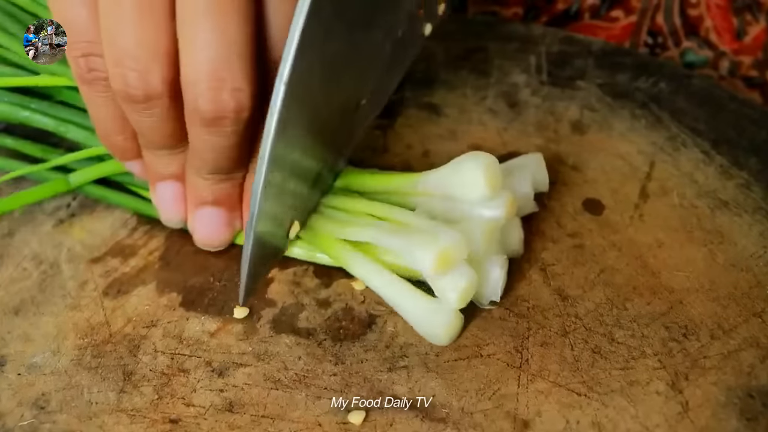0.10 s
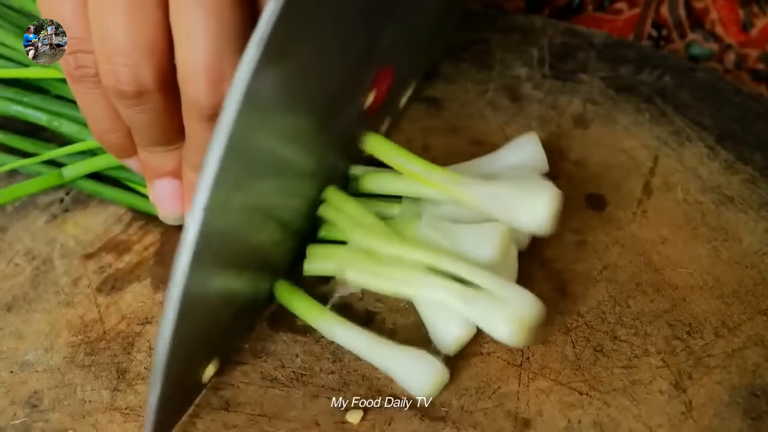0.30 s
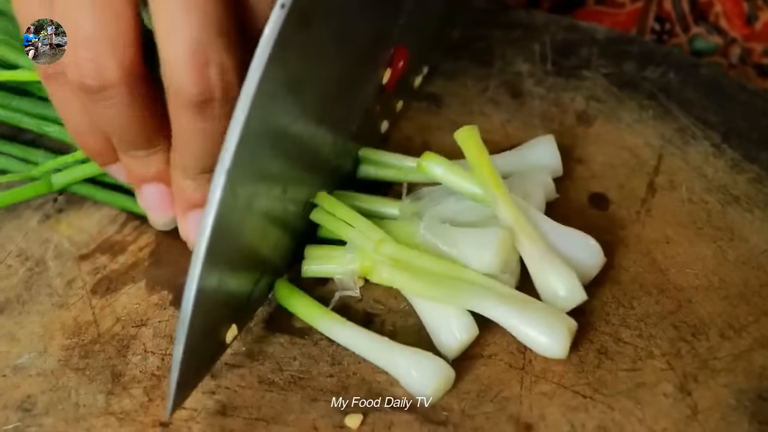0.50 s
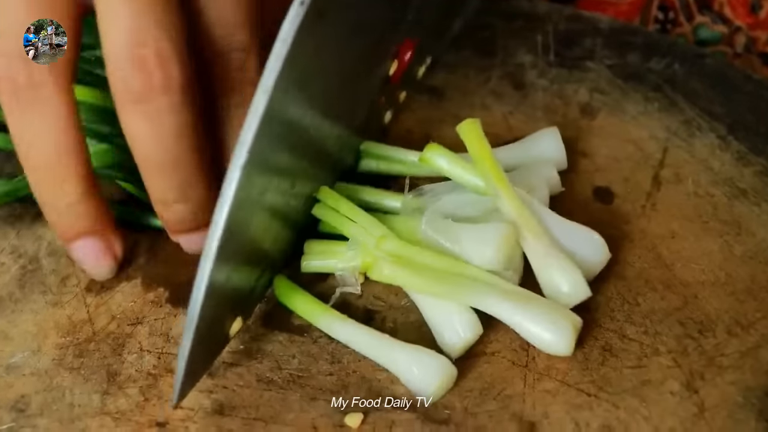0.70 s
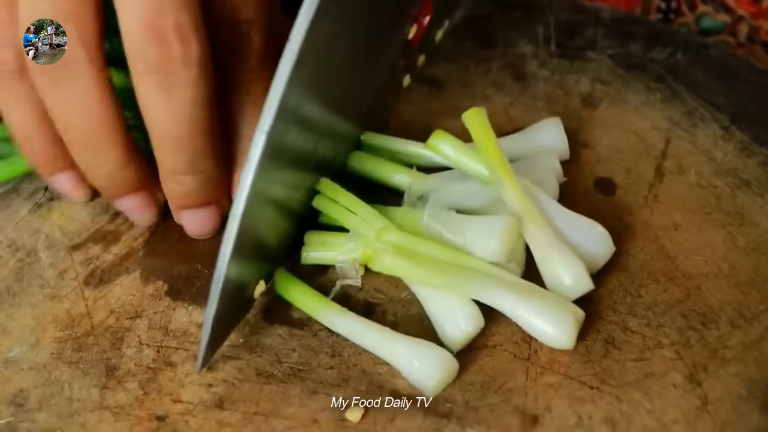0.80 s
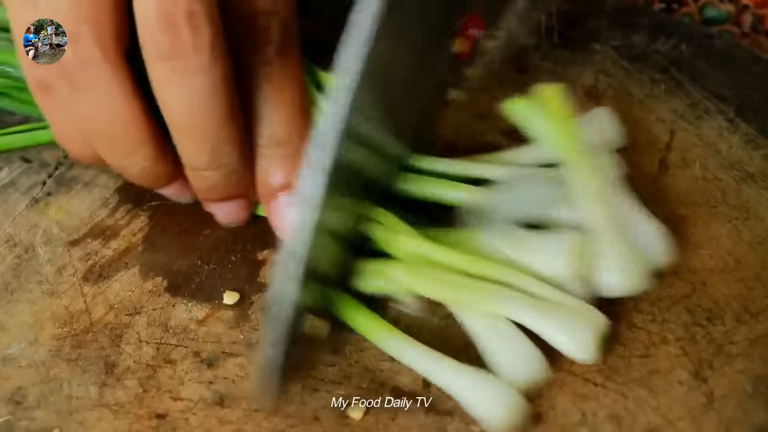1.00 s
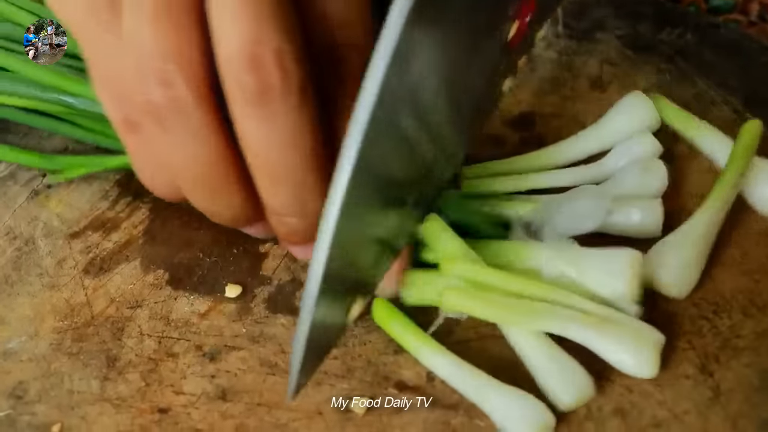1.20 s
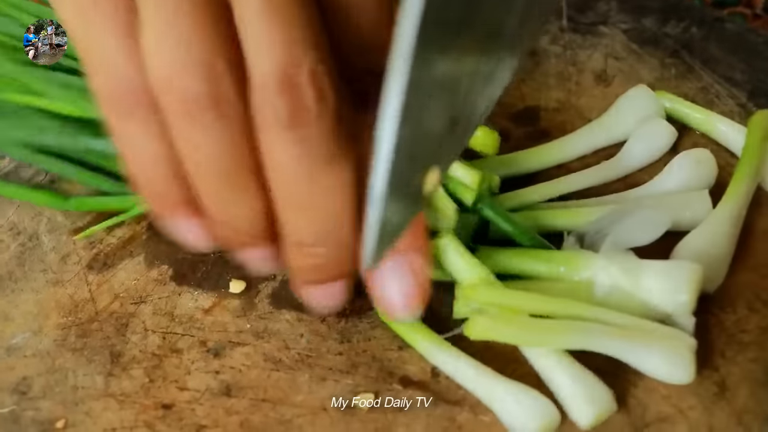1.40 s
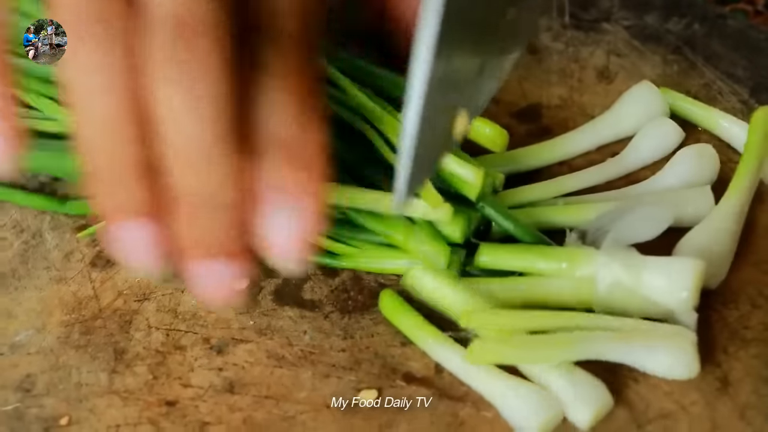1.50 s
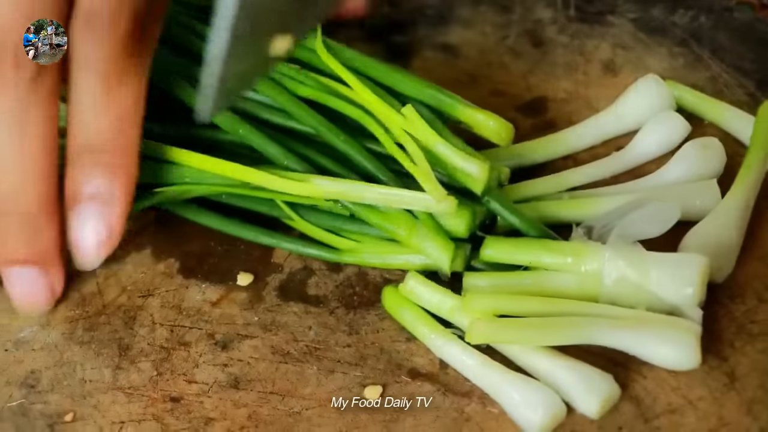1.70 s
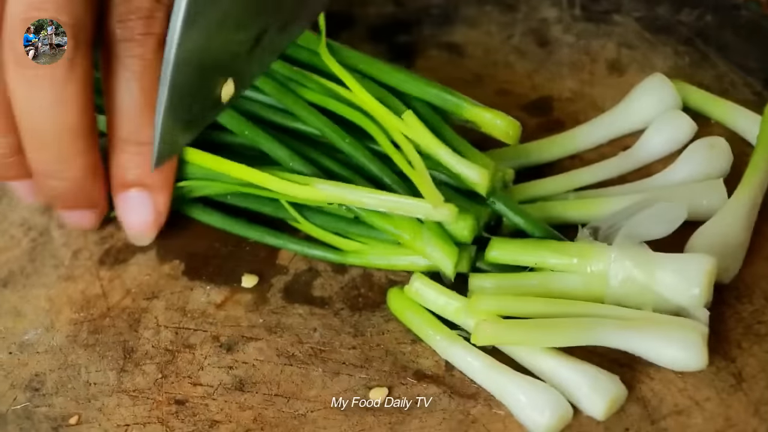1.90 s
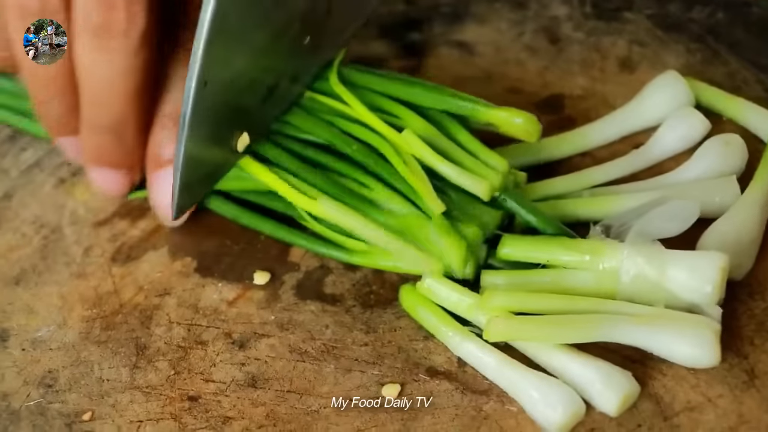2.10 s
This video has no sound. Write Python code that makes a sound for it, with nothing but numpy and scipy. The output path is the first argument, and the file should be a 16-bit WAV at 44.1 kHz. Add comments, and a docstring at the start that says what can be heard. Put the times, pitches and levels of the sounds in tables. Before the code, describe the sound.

A knife cuts spring onions close up: the stalks creak and snap, swelling into a crisp crunch, and the blade knocks firmly into a wooden board at 0.3 seconds. Short, quieter scrapes and ticks push the pieces aside until about 1.1 seconds, ending with a faint ring of steel. Then leaves rustle softly as fingers gather them, with light blade taps from 1.6 to 2.1 seconds over faint hiss.

```python
"""Close up, a broad kitchen knife cuts through a bunch of spring onions on a thick wooden board.
The stalks creak, snap and give way in a crunch of tearing fibres; at 0.3 s the edge knocks into the wood.
Short strokes then scrape the cut ends aside, their tiny slips ringing the board, and the steel sings.
From about 1.1 s fingers gather the rustling leaves, and the blade is set on them again with light taps.
A faint hiss, fine crackle and rumble lie under it all."""
import sys
import numpy as np
from scipy import signal
from scipy.fft import rfft, irfft
from scipy.io import wavfile
from scipy.ndimage import uniform_filter1d

SR = 44100
rng = np.random.default_rng(int(sys.argv[2]) if len(sys.argv) > 2 else 0)


def generate_wav(sig):
    """Save sig (samples, or channels by samples) to the path in sys.argv[1] as 16-bit PCM at SR."""
    pcm = np.round(np.clip(np.atleast_2d(sig).T, -1, 1) * 32767).astype(np.int16)
    wavfile.write(sys.argv[1], SR, pcm)


N = 92610
TIME = np.arange(N) / SR


# swell of the fibres tearing under the edge: t/s, level/dB
CRUNCH_ENVELOPE = [(0, -47.5), (.075, -43), (.15, -44.5), (.162, -38.5), (.203, -47.5), (.22, -33.5),
                   (.241, -26.5), (.246, -19.5), (.258, -18.5), (.28, -22), (.289, -17.5), (.297, -40.5),
                   (.36, -53.5), (.376, -58.5)]
# tone of the crunch: f/Hz, level/dB
CRUNCH_EQ = [(150, -3.5), (330, -9), (700, -2.5), (2500, -13), (4000, -3), (5200, -2), (6800, -9.5),
             (9000, -2), (10500, -13.5), (13500, -9.5), (15500, -11.5)]
# force of the cut passed into the board: t/s, level/dB
CUT_FORCE = [(0, -77), (.2, -46), (.24, -32), (.248, -22.5), (.28, -20), (.289, -19), (.296, -38),
             (.31, -68)]

def cut(creak_end_s=.243):
    """The stalks creak under the edge, then give way in a dense crunch that shakes the board."""
    creak = crackle(per_s=3000, spread_db=4)
    crunch = crackle(per_s=3500, spread_db=3.5)
    fibres = equalise(np.where(TIME < creak_end_s, creak, crunch), CRUNCH_EQ)
    return envelope(CRUNCH_ENVELOPE) * fibres + rubbed_board(envelope(CUT_FORCE))


# single fibres and leaves breaking: t/s, level/dB, centre f/Hz, t60/s
FIBRE_SNAPS = [(.0165, -37.5, 3850, 0.027), (0.0355, -35.5, 11000, 0.013), (.053, -54, 4000, 0.0089),
               (0.0745, -26.5, 9900, 0.0087), (0.1163, -23, 4070, 0.015), (0.1193, -29, 5000, .015),
               (.1265, -16.5, 10200, 0.0052), (0.1597, -29.5, 10000, 0.029), (0.2114, -26, 11000, .01),
               (0.2183, -29.5, 2420, .012), (.2335, -29, 5000, 0.0095), (.2435, -19, 12000, 0.0051),
               (0.2502, -32, 6800, 0.0043), (0.2565, -11, 4930, 0.0072), (0.3629, -29, 9200, 0.016),
               (.626, -39.5, 2800, .025), (0.681, -39, 2930, .025), (.795, -31, 3240, .012),
               (.8115, -53, 4000, 0.015), (0.819, -35, 3480, 0.013), (1.0404, -25.5, 5630, 0.011),
               (1.4686, -39.5, 2800, .02), (1.546, -35.5, 2200, 0.02), (1.656, -45, 2930, 0.079),
               (1.794, -34.5, 2520, 0.018), (1.835, -40, 3160, 0.022), (1.876, -38.5, 2600, 0.038),
               (2.001, -36.5, 3100, 0.019), (2.0757, -37, 3550, 0.009)]

def snaps():
    """Each breaking fibre is a bright noise burst with an instant attack and a short tail."""
    return sum(from_db(db) * decay(start, t60) * band_noise(hz, width=.98)
               for start, db, hz, t60 in FIBRE_SNAPS)


# modes of the board with the blade on it: f/Hz, struck level/dB, rubbed or tapped level/dB, t60/s
BOARD_MODES = [(64, -29, -64, 0.1), (166.6, -18.5, -55, 0.082), (450, -10.5, -10.5, 0.034),
               (580, -2.5, -22.5, 0.017), (736.5, 1.5, 0, 0.02), (843, -42, -5.5, 0.033),
               (1235, -30, -9, 0.02), (1386, -21, -35, 0.036), (2200, -21, -28, 0.03),
               (4350, -42, -24, 0.025)]

def chop():
    """The edge lands hard on the wood once and rings the board's modes."""
    blow = contact(start=.291, db=1.5, length_s=.0005)
    return sum(from_db(db) * ring(blow, hz, t60) for hz, db, _, t60 in BOARD_MODES)


def touched_board(force):
    """Light contact drives mostly the upper modes of the board, with only a trace of low end."""
    highpass = signal.butter(4, 521, "high", fs=SR, output="sos")
    drive = signal.sosfilt(highpass, force) + .05 * force
    return sum(from_db(db) * ring(drive, hz, t60) for hz, _, db, t60 in BOARD_MODES)


def rubbed_board(force):
    """Tiny slips of the edge keep the board ringing, louder with more force."""
    slips = grains(per_s=1600, spread_db=2.5, window_samples=350)
    return touched_board(slips * force) / np.std(touched_board(slips))


# light knocks of the blade: t/s, level/dB, contact time/s
BLADE_TAPS = [(.117, -28.5, 0.0003), (.2445, -16, 0.00039), (.334, -21.5, 0.00085), (0.3961, -26, 0.00096),
              (.421, -36, 0.00061), (.4255, -21.5, 0.00055), (0.624, -38, .0003), (0.7949, -22, 0.00021),
              (.806, -68, 0.00025), (.812, -26.5, 0.00014), (0.8205, -23, 0.00031), (0.8773, -21, 0.001),
              (.979, -29, 0.00061), (1.003, -22.5, 0.00084), (1.0672, -20, 0.00066),
              (1.0775, -22.5, 0.0006), (1.089, -32, 0.00038), (1.653, -34.5, 0.001),
              (1.821, -28.5, 0.00071), (1.891, -34, 0.00068), (2.074, -40, 0.0013)]

def taps():
    """The edge touches down lightly, each contact a small woody tick."""
    return touched_board(sum(contact(*tap) for tap in BLADE_TAPS))


# dull bumps of hand and blade on the board: t/s, level/dB, f/Hz
BOARD_THUMPS = [(0.246, -18.5, 137), (0.372, -32.5, 192), (0.859, -35.5, 90), (0.983, -33, 118),
                (1.093, -26.5, 99), (1.647, -30, 61.3), (1.726, -33.5, 63.6), (1.754, -30, 102)]

def thumps(attack_s=.0018, t60=.056):
    """Each bump adds weight: a low sine that dies within a few cycles."""
    out = 0
    for start, db, hz in BOARD_THUMPS:
        age = time_since(start)
        attack = 1 - np.exp(-age / attack_s)
        out += from_db(db) * attack * decay(start, t60) * np.sin(2 * np.pi * hz * age)
    return out


# strokes of the edge over the wood: start t/s, end t/s, wood level/dB, grit level/dB
SCRAPE_STROKES = [(0.31, 0.363, -35, -46.5), (.416, 0.425, -32.5, -58), (0.434, .46, -38, -51),
                  (0.454, 0.501, -34, -44), (0.493, 0.52, -41.5, -53), (0.615, 0.687, -52, -51),
                  (0.738, 0.785, -41.5, -56), (0.794, 0.825, -31, -38), (0.834, 0.844, -35.5, -56),
                  (0.87, 0.888, -39, -69), (0.903, 0.958, -49.5, -80), (0.974, 1.053, -39, -75),
                  (1.052, 1.093, -37.5, -62), (1.812, 1.835, -40, -49), (2.069, 2.072, -36, -55)]
# tone of the grit under the edge: f/Hz, level/dB
GRIT_EQ = [(500, -30), (1500, 20.5), (3000, 0.5), (4700, -5), (6500, -63), (9000, -4), (11000, -39),
           (15500, -4)]

def scrapes():
    """The blade pushes the pieces aside: a body of ringing wood with fine grit on top."""
    force = np.max([stroke(start, end, db) for start, end, db, _ in SCRAPE_STROKES], axis=0)
    grit_gain = np.max([stroke(start, end, db) for start, end, _, db in SCRAPE_STROKES], axis=0)
    grit = equalise(grains(per_s=4300, spread_db=2.5), GRIT_EQ)
    return rubbed_board(force) + grit_gain * grit


# low, hollow rubs: start t/s, end t/s, level/dB, centre f/Hz
RUB_GROANS = [(0.142, 0.191, -51, 330), (0.32, .375, -52, 352), (0.47, 0.485, -41, 530),
              (0.82, .89, -48, 422), (0.979, 1.103, -41.5, 472), (1.752, 1.756, -46, 450),
              (1.819, 1.831, -42.5, 396), (1.833, 1.963, -50, 400), (2.069, 2.087, -46, 413)]

def groans():
    """Where the blade bears down, the rub groans in a narrow band of noise."""
    return sum(stroke(start, end, db) * band_noise(hz, width=.18) for start, end, db, hz in RUB_GROANS)


# modes of the steel: f/Hz, level/dB
STEEL_MODES = [(3020, -1), (3330, -7), (4520, -1), (6260, -3), (8050, -1)]
# slides that make it sing: start t/s, end t/s, level/dB
SINGING_SLIDES = [(1.061, 1.092, -50.5), (1.217, 1.224, -50)]

def blade_song(t60=.099):
    """Sliding friction briefly sets the steel's narrow modes singing."""
    steel = sum(from_db(db) * unit_rms(ring(rng.standard_normal(N), hz, t60)) for hz, db in STEEL_MODES)
    return steel * sum(stroke(*slide) for slide in SINGING_SLIDES)


# wet stalks on the blade: start t/s, end t/s, level/dB, centre f/Hz
STALK_SWISHES = [(0.156, 0.217, -40.5, 8550), (1.218, 1.23, -52, 12700), (1.415, 1.425, -46, 12800),
                 (1.424, 1.454, -49.5, 8460), (1.656, 1.661, -48, 8000), (1.68, 1.71, -52, 8600)]

def swishes():
    """Wet stalks brush the steel in short, airy strokes of noise."""
    return sum(stroke(start, end, db) * band_noise(hz, width=.23) for start, end, db, hz in STALK_SWISHES)


def leaf_pop(start=1.9562, peak_db=-22, hz=1660, t60=.0063):
    """A hollow leaf pops: a click rings one pitch, and a second resonator rounds the attack."""
    click = signal.unit_impulse(N, int(start * SR))
    pop = ring(ring(click, hz, t60), hz, t60 / 2)
    return from_db(peak_db) * pop / np.abs(pop).max()


# fine background crackle, then rustling leaves from about 1.1 s: t/s, level/dB
CRACKLE_RUSTLE_ENVELOPE = [(0, -48.5), (.3, -42.5), (.39, -61), (.56, -50.5), (.72, -54.5), (.89, -48),
                           (.96, -50), (1.15, -50.5), (1.22, -46.5), (1.31, -46), (1.37, -49.5),
                           (1.45, -46.5), (1.62, -52.5), (1.69, -46.5), (1.77, -51.5), (1.87, -49),
                           (1.97, -49), (2.01, -47.5), (2.1, -50.5)]
# tone of both: f/Hz, level/dB
CRACKLE_RUSTLE_EQ = [(200, -17), (300, -10), (430, 4), (550, -3.5), (800, 3.5), (1100, -0.5), (1500, 3),
                     (2200, -1.5), (3300, -3), (5000, -7), (7200, -6.5), (9300, -9), (11000, -13),
                     (15500, -16.5)]

def crackle_and_rustle():
    """Fine background crackle drops after the chop and creeps back; from about 1.1 s, leaves rustle."""
    texture = equalise(crackle(per_s=4300, spread_db=2.5), CRACKLE_RUSTLE_EQ)
    return envelope(CRACKLE_RUSTLE_ENVELOPE) * texture


# drift of the rumble: t/s, level/dB
RUMBLE_ENVELOPE = [(0, -49.5), (.4, -47), (.55, -51), (1.4, -53), (1.55, -50), (1.95, -48), (2.1, -50.5)]
# tone of the rumble: f/Hz, level/dB
RUMBLE_EQ = [(15, -3.5), (32, 2), (45, -7), (65, 1.5), (100, -7), (165, -9), (250, -20.5), (600, -36),
             (2000, -75)]
# tone of the centre hiss: f/Hz, level/dB
HISS_EQ = [(200, 8.5), (450, -4.5), (850, -8), (1100, -9), (1450, -17), (4600, -9), (9000, -28),
           (15500, -44)]

def background():
    """A bed of steady hiss and slowly drifting rumble."""
    hiss = equalise(rng.standard_normal(N), HISS_EQ)
    rumble = equalise(rng.standard_normal(N), RUMBLE_EQ)
    return from_db(-55) * hiss + envelope(RUMBLE_ENVELOPE) * rumble


# tone of the hiss that differs between the channels: f/Hz, level/dB
SIDE_HISS_EQ = [(60, 3), (400, 8), (1500, -9), (5000, -2.5), (14000, 4)]

def side_hiss():
    """A very faint hiss that gives the bed its width."""
    return from_db(-68) * equalise(rng.standard_normal(N), SIDE_HISS_EQ)


def from_db(db):
    """Decibels to gain."""
    return 10 ** (np.asarray(db) / 20)


def unit_rms(x):
    """Scale to rms 1."""
    return x / np.sqrt(np.mean(x ** 2) + 1e-20)


def time_since(start):
    """Seconds since the start; zero before it."""
    return np.maximum(TIME - start, 0)


def envelope(points):
    """Gain curve through (t/s, level/dB) points."""
    return from_db(np.interp(TIME, *np.transpose(points)))


def decay(start, t60):
    """Envelope that opens at once and falls 60 dB every t60 seconds."""
    return (TIME >= start) * from_db(-60 * time_since(start) / t60)


def stroke(start, end, db, attack_s=.011, release_s=.007):
    """Envelope of one stroke: quick rise, hold, dying release."""
    attack = np.clip((TIME - start) / attack_s + .5, 0, 1)
    return from_db(db) * attack * np.exp(-time_since(end) / release_s)


def contact(start, db, length_s):
    """Force pulse of one contact; a longer one is duller."""
    pulse = np.sin(np.pi * np.clip((TIME - start) / length_s, 0, 1)) ** 2
    return from_db(db) * pulse / pulse.sum()


def ring(x, hz, t60):
    """One mode: a unit click sets a sine of height about 1 ringing."""
    radius = from_db(-60 / (t60 * SR))
    angle = 2 * np.pi * hz / SR
    return signal.lfilter([.5, 0, -.5], [1, -2 * radius * np.cos(angle), radius ** 2], x + 1e-18)


def equalise(x, curve):
    """Minimum-phase EQ through (f/Hz, level/dB) points; the result has rms 1."""
    hz, db = np.transpose(curve)
    bin_hz = np.maximum(np.arange(N // 2 + 1) * SR / N, 1)
    gain = from_db(np.interp(np.log(bin_hz), np.log(hz), db))
    cepstrum = irfft(np.log(gain), N)
    # fold onto positive time, so nothing rings ahead of a click
    cepstrum[1:N // 2] *= 2
    cepstrum[N // 2 + 1:] = 0
    return unit_rms(irfft(rfft(x) * np.exp(rfft(cepstrum)), N))


def bandpass(x, edges_hz):
    """Band filter with gentle slopes."""
    return signal.sosfilt(signal.butter(2, edges_hz, "band", fs=SR, output="sos"), x)


def band_noise(hz, width):
    """Noise band of rms 1; width is roughly the bandwidth as a share of the centre."""
    edges_hz = np.clip([hz / (1 + width / 2), hz * (1 + width / 2)], 10, SR / 2 - 1000)
    return unit_rms(bandpass(rng.standard_normal(N), edges_hz))


def grains(per_s, spread_db, window_samples=700):
    """Random clicks of uneven size, their power held steady over the window."""
    sizes = from_db(spread_db * np.minimum(rng.exponential(1, N), 5)) * rng.choice([-1, 1], N)
    clicks = sizes * (rng.random(N) < per_s / SR)
    power = np.abs(uniform_filter1d(clicks ** 2, window_samples))
    return clicks / np.sqrt(power + 1e-4)


def crackle(per_s, spread_db):
    """Four bands, each with per_s clicks a second: cracks differ in tone, the sum is flat."""
    edges_hz = [100, 2800, 6800, 10000, 18000]
    return sum(bandpass(grains(per_s, spread_db), band) for band in zip(edges_hz, edges_hz[1:]))


def scene():
    """Knife, board and leaves sit in the centre; only the side hiss has width."""
    cutting = cut() + snaps() + chop() + taps() + thumps()
    sweeping = scrapes() + groans() + blade_song()
    mid = cutting + sweeping + crackle_and_rustle() + swishes() + leaf_pop() + background()
    side = side_hiss()
    return np.array([mid + side, mid - side])


def record(dry, ceiling=.97, stopband_hz=16250):
    """Peaks clip at the ceiling, then a steep low-pass takes off the very top."""
    lowpass = signal.cheby2(24, 70, stopband_hz, fs=SR, output="sos")
    return signal.sosfilt(lowpass, np.clip(dry, -ceiling, ceiling))


dry = scene()
out = record(dry)
generate_wav(out)
```